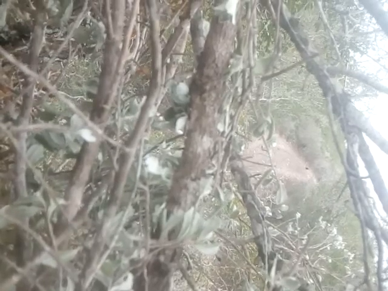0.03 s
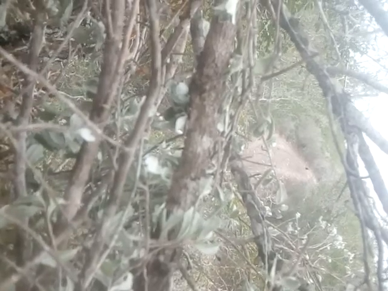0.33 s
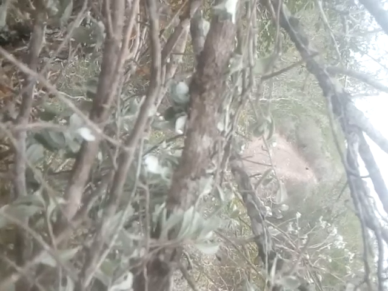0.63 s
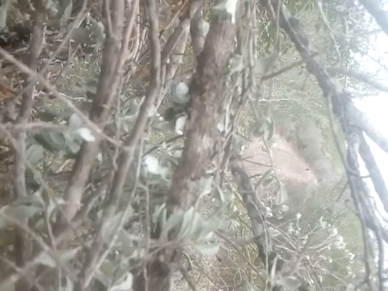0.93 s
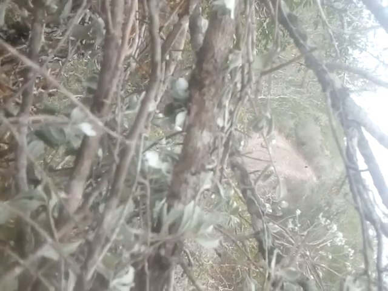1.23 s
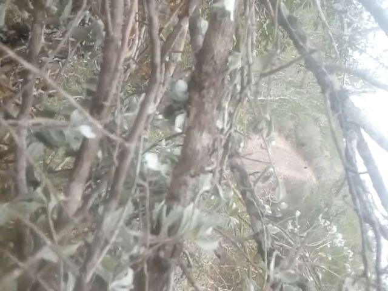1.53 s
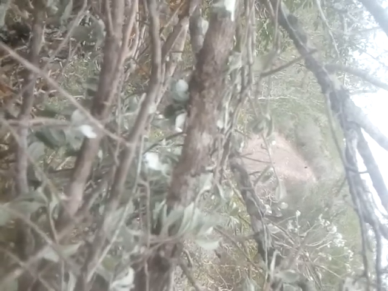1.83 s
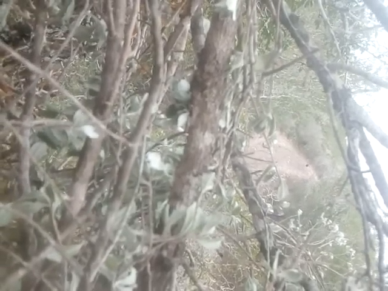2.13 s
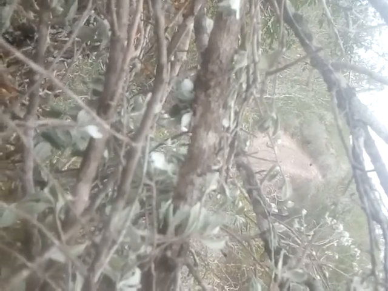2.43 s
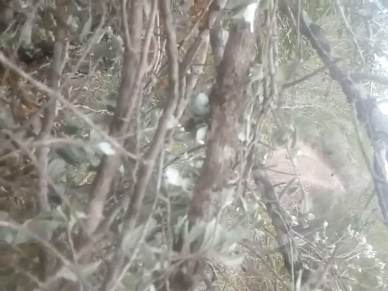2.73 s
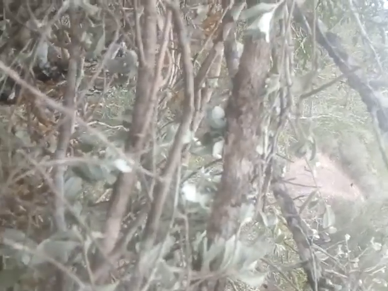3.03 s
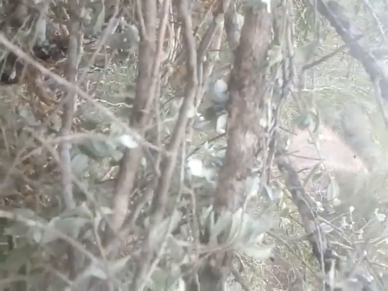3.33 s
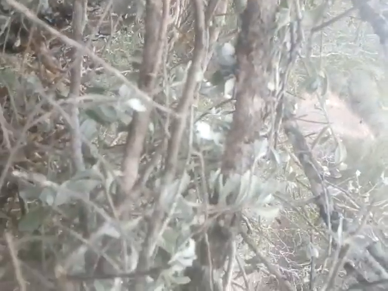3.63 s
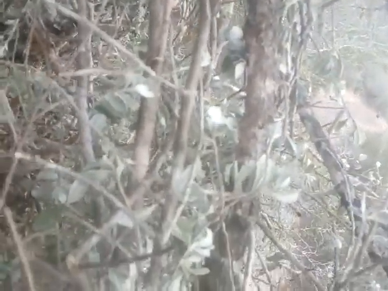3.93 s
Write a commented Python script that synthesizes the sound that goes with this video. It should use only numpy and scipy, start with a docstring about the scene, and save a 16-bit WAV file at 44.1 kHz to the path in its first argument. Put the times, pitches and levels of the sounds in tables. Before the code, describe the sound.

A short burst of rubbing on the microphone, starting with a knock, comes near the end, followed by light brushes and clicks. Before it, small birds chirp faintly among quiet trees and a far drone swells slightly.

```python
"""Handling a camera in a quiet thicket

Faint outdoor air hisses, a far drone swells, and a few small birds whistle among the trees.
The grip on a hand-held camera shifts with soft bumps and ticks. Then something, probably cloth
or skin, catches on the case with a knock and slides over it in two strokes, its many tiny slips
blending into a rubbing noise. A few light brushes and clicks follow."""
import sys
import numpy as np
from scipy import signal
from scipy.fft import rfft, irfft
from scipy.io import wavfile

SR = 44100
rng = np.random.default_rng(int(sys.argv[2]) if len(sys.argv) > 2 else 0)


def store_wav(level_fs):
    """Save 16-bit WAV to argv[1]."""
    pcm = np.round(np.clip(np.atleast_2d(level_fs), -1, 1) * 32767)
    wavfile.write(sys.argv[1], SR, pcm.T.astype(np.int16))


N = 176400  # 4 seconds

# Tone colour of the outdoor air and microphone hiss (frequency [Hz], relative level [dB])
AIR_COLOUR = [(20,-8),(50,-6.5),(120,-0.5),(260,0),(480,-1),(720,-3.5),(1200,-6.5),(2200,-9.3),(4400,-10.5),(6200,-13.5),(7100,-16.5),(8000,-24.5),(13800,-26),(14400,-19),(14900,-13.5),(15600,-14)]
# Loudness of the far drone (time [s], level [dB])
DRONE_LEVELS = [(0,-79),(1.55,-80.5),(1.85,-70.5),(2.15,-68.5),(2.55,-67.5),(2.95,-75.5),(3.7,-80.5),(4,-71.5)]
# Tone colour of the far drone (frequency [Hz], relative level [dB])
FAR_DRONE_COLOUR = [(150,-41),(300,-12),(390,-3.5),(440,0),(520,-6),(700,-22),(1500,-51)]
# Bird notes (start [s], length [s], level [dB], start pitch [Hz], middle pitch [Hz], end pitch [Hz])
BIRD_NOTES = [(.275,.022,-70.5,3670,3600,3550),(0.604,.04,-71,3600,4000,4100),(.945,.05,-68.5,4400,4420,4320),(0.971,.18,-76,2720,2650,2600),(0.993,.1,-73,4400,4230,4000),(1.211,.022,-69,3520,3700,3650),(1.917,0.012,-63.5,4200,4080,4300),(1.932,0.012,-59.5,4520,4100,4350),(1.946,0.02,-58,4460,4050,3800),(1.974,0.07,-69.5,5000,4950,5000),(2.029,.062,-67,4750,4350,4200)]
# How hard the case is rubbed (time [s], strength [dB])
RUB_STRENGTH = [(2.3,-79),(2.59,-69.5),(2.65,-66.5),(2.86,-61.5),(3.0,-62.5),(3.08,-52.5),(3.115,-51),(3.158,-42),(3.172,-26.5),(3.188,-30),(3.203,-38),(3.232,-30),(3.29,-39.5),(3.38,-41),(3.41,-37),(3.46,-34),(3.492,-44),(3.527,-42),(3.585,-63),(3.62,-78)]
# Light brushes after the slide (middle time [s], half length [s], strength [dB])
LIGHT_BRUSHES = [(3.63,0.042,-62.5),(3.729,0.041,-60),(3.833,0.033,-63.5),(3.881,0.02,-56),(3.919,.015,-60.5),(3.951,0.023,-59)]
# Tone colour of the fine rubbing hiss (frequency [Hz], relative level [dB])
HISS_COLOUR = [(50,-31),(150,-26),(400,-17),(800,-12),(1400,-4.5),(2000,-3.3),(3200,-1.6),(4200,-1),(5200,0.5),(6100,-3),(6700,-11),(7300,-25.5),(8000,-34),(11000,-43),(15500,-45)]
# Tone colour of the coarser slips (frequency [Hz], relative level [dB])
SLIP_COLOUR = [(40,-35),(130,-20.5),(450,-10),(750,-10.5),(1100,-5),(1900,2.5),(2600,-2),(3800,-8.5),(5000,-7),(6200,-11),(7000,-35),(8000,-49),(15000,-60)]
# Ticks of the case (time [s], level [dB], pitch [Hz], half length [ms], bright snap [share])
CASE_TICKS = [(2.4003,-48,2100,.45,.05),(2.4096,-41.5,2100,0.4,.05),(2.630,-47,3000,.25,0.65),(2.723,-48,4000,.25,.4),(2.7468,-43,5000,.25,.3),(2.8172,-46,1900,0.39,.4),(2.8262,-51,3000,.3,.4),(2.9365,-37.5,1600,0.41,.15),(3.4386,-30,2200,.25,0.55),(3.527,-34.5,1890,0.54,.2),(3.685,-41.5,1720,0.41,0.85),(3.8799,-30,2250,0.32,0.84),(3.8814,-38.5,1600,0.42,0.5),(3.882,-43,1050,0.57,.05)]
# Soft finger bumps (time [s], level [dB], pitch [Hz])
FINGER_BUMPS = [(2.555,-66,65),(2.612,-63.5,80),(2.678,-61,85),(2.752,-59,80),(2.892,-50,120),(3.021,-51.5,101)]
# The catch that starts the slide (time [s], level [dB], pitch [Hz], half length [ms], bright snap [share])
CATCH = (3.1657,-10.5,1600,0.26,0.31)


def amp(db):
    """Turns decibels into a number to multiply a sound by."""
    return 10 ** (np.asarray(db) / 20)


def unit(x):
    """Scales a signal to an average size (rms) of one."""
    return x / np.sqrt(np.mean(x ** 2) + 1e-20)


def curve(points):
    """Joins (time [s], value) points by straight lines."""
    return np.interp(np.arange(N) / SR, *np.transpose(points))


def add(mix, start_s, sound):
    """Mixes a sound in at the given time."""
    part = mix[max(round(start_s * SR), 0):][:len(sound)]
    part += sound[:len(part)]


def coloured(x, colour):
    """Gives a signal a tone colour, and an average size of one."""
    table_hz, table_db = np.transpose(colour)
    hz = np.fft.rfftfreq(len(x), 1 / SR)
    gain = amp(np.interp(np.log(hz + 1), np.log(table_hz + 1), table_db))
    return unit(irfft(rfft(x) * gain, len(x)))


def wander(rate_hz):
    """A random wobble of average size one, mostly slower than rate_hz."""
    hz = np.fft.rfftfreq(N, 1 / SR)
    return unit(irfft(rfft(rng.standard_normal(N)) / (1 + (hz / rate_hz) ** 2), N))


def outdoor_air(level_db=-64.5, waver_db=0.1):
    """Air and microphone hiss: faint, almost steady noise."""
    return coloured(rng.standard_normal(N), AIR_COLOUR) * amp(level_db + waver_db * wander(rate_hz=4))


def far_drone():
    """A narrow band of noise that swells and fades, perhaps traffic."""
    return coloured(rng.standard_normal(N), FAR_DRONE_COLOUR) * amp(curve(DRONE_LEVELS))


def birds(wobble_share=0.0354, echo_db=-10, echo_s=0.6):
    """Short wobbling whistles, scattered by the trees into a soft echo."""
    whistles = np.zeros(N)
    wobble = 1 + wobble_share * wander(rate_hz=240)
    for start_s, length_s, db, *pitches_hz in BIRD_NOTES:
        progress = np.linspace(0, 1, int(length_s * SR))
        hz = np.interp(progress, [0, .5, 1], pitches_hz) * wobble[int(start_s * SR):][:len(progress)]
        swell = np.sqrt(2 * abs(np.sin(np.pi * progress)))
        add(whistles, start_s, amp(db) * swell * np.sin(2 * np.pi * np.cumsum(hz) / SR))
    t = np.arange(SR) / SR
    tail = rng.standard_normal(SR) * amp(-60 * t / echo_s)
    echo = signal.fftconvolve(whistles, tail / np.linalg.norm(tail))[:N]
    return whistles + amp(echo_db) * echo


def friction(colour, per_s, spread_db, flutter_db=1):
    """Tiny random slips of uneven size blur into a fluttering noise."""
    sizes = amp(spread_db * np.minimum(rng.exponential(1, N), 4))
    grains = sizes * rng.choice([-1, 1], N) * (rng.random(N) < per_s / SR)
    return coloured(grains, colour) * amp(flutter_db * wander(rate_hz=100))


def rubbing(firm_db=-39, hiss_gain_db=-2.06, slip_gain_db=-5):
    """Fine hiss follows the stroke; coarse slips take over as it presses harder."""
    t = np.arange(N) / SR
    power = amp(curve(RUB_STRENGTH)) ** 2
    for middle_s, half_s, db in LIGHT_BRUSHES:
        power += amp(db) ** 2 * np.exp(-2 * ((t - middle_s) / half_s) ** 2)
    force = np.sqrt(power) / amp(firm_db)  # 1 is a firm stroke
    hiss = amp(hiss_gain_db) * friction(HISS_COLOUR, per_s=14000, spread_db=3)
    slips = amp(slip_gain_db) * friction(SLIP_COLOUR, per_s=7000, spread_db=2.5)
    return amp(firm_db) * (hiss * force ** 0.88 + slips * force ** 1.23)


def ticks(contacts, snap_hz=4970, snap_ms=0.26):
    """Each contact shakes the case once or twice, with a bright snap on top."""
    out = np.zeros(N)
    ms = np.linspace(-2, 2, round(.004 * SR))
    for time_s, db, hz, half_ms, snap_share in contacts:
        body = np.exp(-(ms / half_ms) ** 2) * np.sin(2 * np.pi * hz * ms / 1000)
        snap = np.exp(-(ms / snap_ms) ** 2) * np.cos(2 * np.pi * snap_hz * ms / 1000)
        add(out, time_s - .002, amp(db) * (body + snap_share * snap))  # centred on time_s
    return out


def finger_bumps(half_s=0.0065):
    """Each bump is one soft push and release of a finger."""
    out, t = np.zeros(N), np.arange(N) / SR
    for time_s, db, hz in FINGER_BUMPS:
        push = np.exp(-((t - time_s - half_s / 2) / half_s) ** 2)
        out += amp(db) * push * np.cos(2 * np.pi * hz * (t - time_s))
    return out


def knock(thud_gain_db=-19, thud_hz=343, fade_ms=1.1, bass_cut_hz=115):
    """Something catches on the case: one loud tick with a short, low thud."""
    out, t = ticks([CATCH]), np.arange(SR // 20) / SR
    thud = np.sin(2 * np.pi * thud_hz * t) * np.exp(-1000 * t / fade_ms)
    bass_cut = signal.butter(2, bass_cut_hz, "high", fs=SR, output="sos")
    add(out, CATCH[0], amp(thud_gain_db) * signal.sosfilt(bass_cut, thud))
    return out


def scene():
    """Adds all the sounds together in one channel."""
    thicket = outdoor_air() + far_drone() + birds()
    handling = rubbing() + ticks(CASE_TICKS) + finger_bumps() + knock()
    return (thicket + handling)[None]


def record(dry):
    """Cuts away the very highest treble."""
    top_hz = 15600
    treble_cut = signal.firwin(801, top_hz, window=("kaiser", 8), fs=SR)
    return signal.oaconvolve(dry, treble_cut[None], "same")


dry = scene()
out = record(dry)
store_wav(out)
```